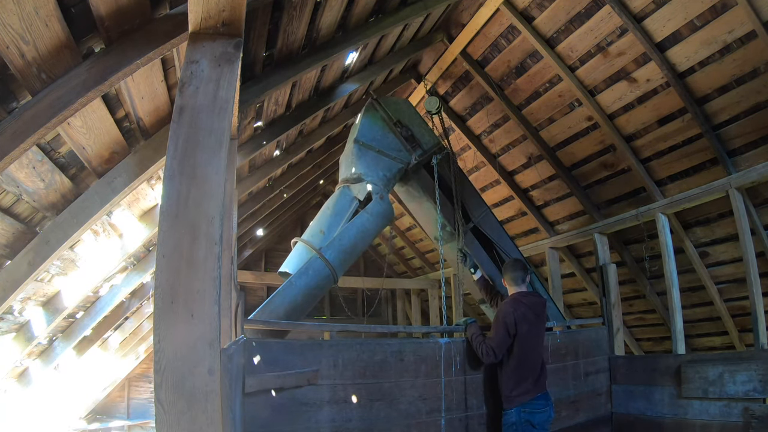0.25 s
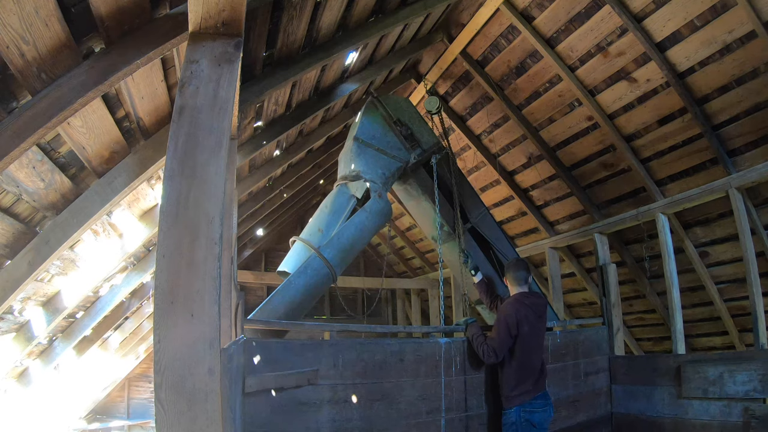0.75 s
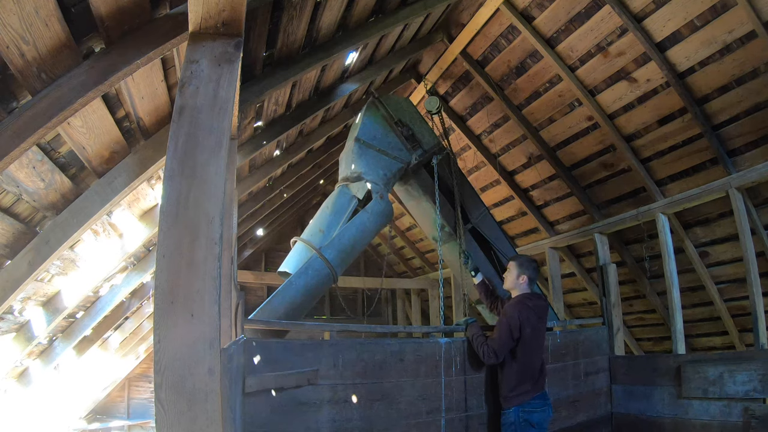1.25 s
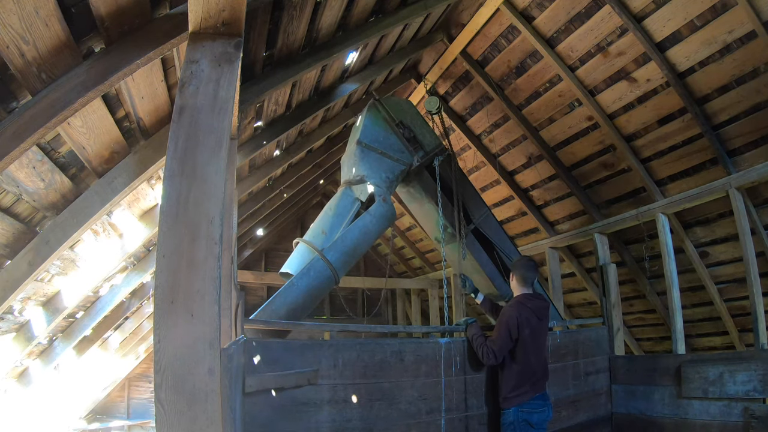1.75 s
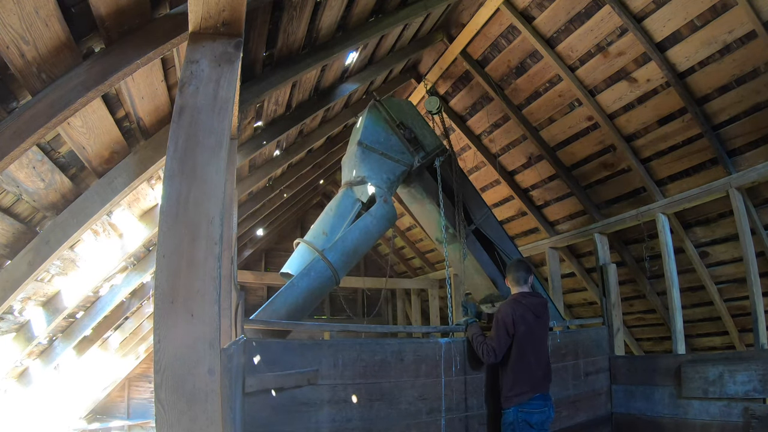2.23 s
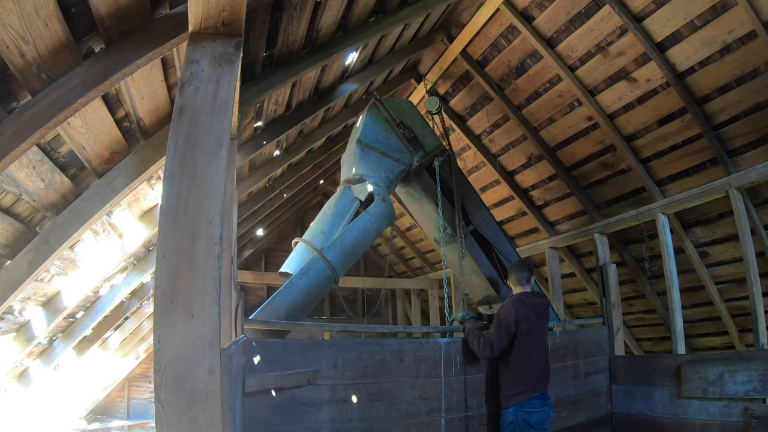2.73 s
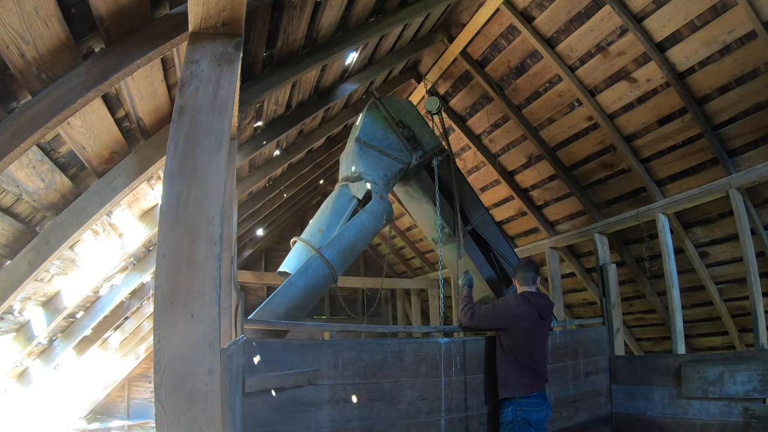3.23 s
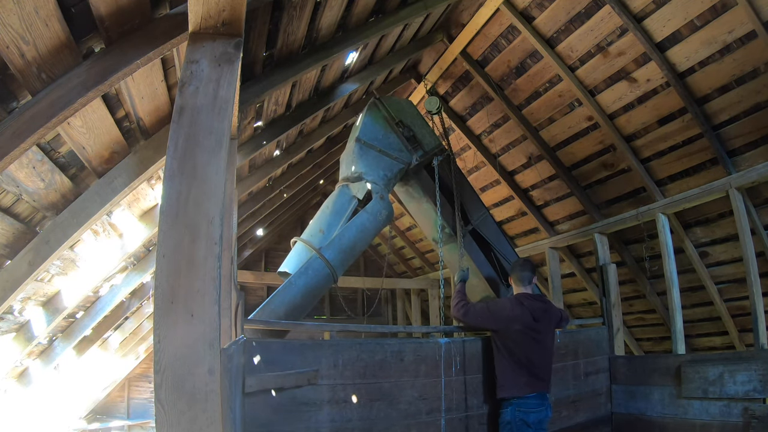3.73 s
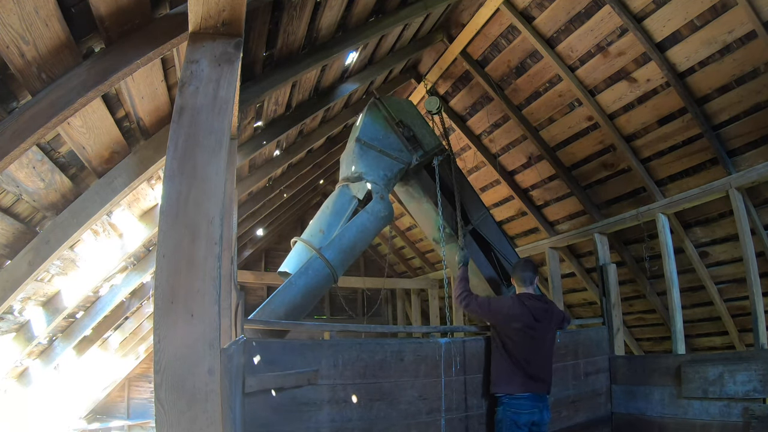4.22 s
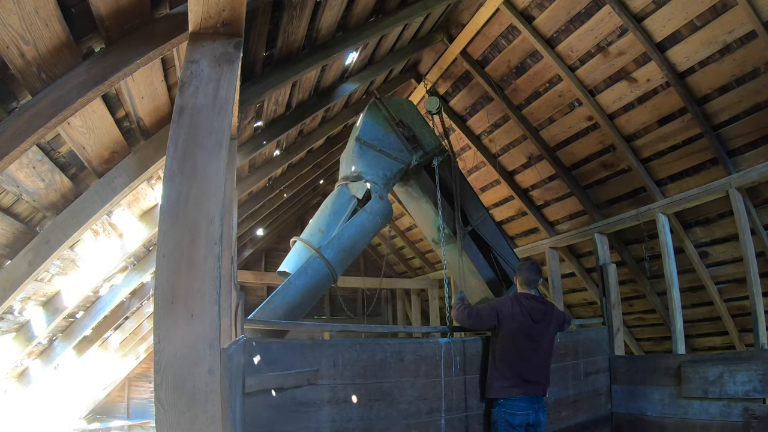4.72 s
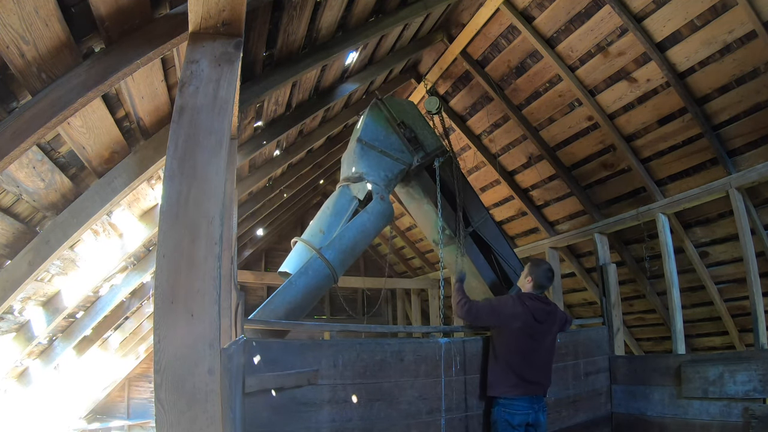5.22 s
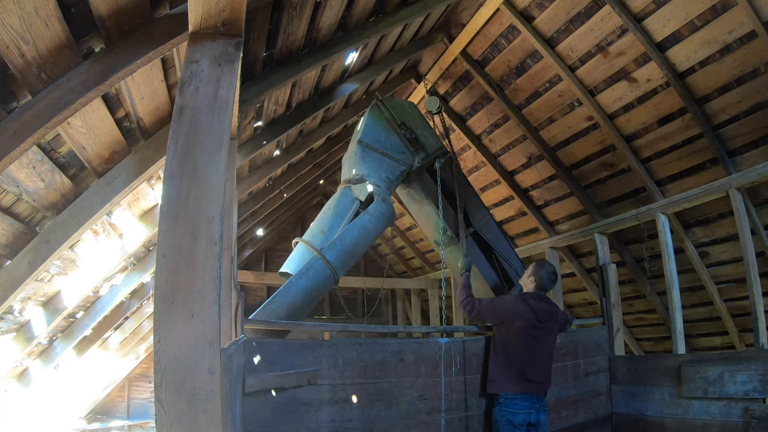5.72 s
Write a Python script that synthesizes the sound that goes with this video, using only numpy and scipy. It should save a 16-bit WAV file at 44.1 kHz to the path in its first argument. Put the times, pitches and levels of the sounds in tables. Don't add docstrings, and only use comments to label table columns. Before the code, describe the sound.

Metal chain links clatter and snap over a hoist wheel in repeated pulls, separated by quiet clinks and dull timber knocks.

```python
import sys
import numpy as np
from scipy import signal
from scipy.fft import rfft, irfft, next_fast_len
from scipy.io import wavfile
from scipy.ndimage import uniform_filter1d

SR = 44100
rng = np.random.default_rng(int(sys.argv[2]) if len(sys.argv) > 2 else 0)


def volts_from_db(level):
    exponent = np.asarray(level, float) / 20
    return 10 ** exponent


def dump(signal):
    limited = np.clip(np.atleast_2d(signal).T, -1, 1)
    pcm = np.round(limited * 32767).astype(np.int16)
    wavfile.write(sys.argv[1], SR, pcm)


N = 262836
PLACES = 6
SIZE = next_fast_len(N + 3 * SR // 4)
HZ = np.maximum(np.arange(SIZE // 2 + 1) * SR / SIZE, 1)

# (frequency [Hz], side over mid [dB])
STEREO_WIDTH = [(60, -19), (110, -10.5), (200, -22), (380, -13), (700, -6), (1290, -3), (2380, -7.5),
                (4400, -8), (8120, 1), (15000, 0.5)]


def in_time(rows):
    s, *columns = np.transpose(rows)
    return [np.interp(np.arange(N) / SR, s, c) for c in columns]


def at_hz(points, hz):
    point_hz, point_db = np.array(points)[:, :2].T
    return np.interp(np.log(hz), np.log(point_hz), point_db)


def causal(db):
    cepstrum = irfft(db * np.log(10) / 20, SIZE)
    cepstrum[1:SIZE // 2] *= 2
    cepstrum[SIZE // 2 + 1:] = 0
    return np.exp(rfft(cepstrum))


def share_db(low_hz, high_hz):
    steep = 12 if high_hz < 300 else 7
    return -10 * np.log10((1 + (low_hz / HZ) ** steep) * (1 + (HZ / high_hz) ** steep))


def uneven_sizes(spread_db):
    return volts_from_db(spread_db * np.minimum(rng.exponential(1, N), 3.0)) * rng.choice([-1, 1], N)


def knocks(per_s, spread_db):
    hits = uneven_sizes(spread_db) * (rng.random(N) < per_s / SR)
    here = rng.integers(0, PLACES, N) == np.arange(PLACES)[:, None]
    return hits * here / np.sqrt(np.mean(hits ** 2))


def dying_away(events, swell_s):
    power = np.zeros(N)
    for s, db, dying in events:
        at = round(s * SR)
        t = np.arange(min(N - at, SR // 2, int(dying * SR))) / SR
        power[at:at + len(t)] += volts_from_db(2 * (db - 60 * t / dying)) * (1 - np.exp(-t / swell_s))
    return power


def pulled(part):
    # (full speed at [s], length [s], links on wheel [dB], sag [dB/s], run-out [dB/s])
    hauls = [
        (1.675, 0.85, -30, 11, 500),
        (2.789, 0.16, -47, 55, 113),
        (4.532, 0.18, -25.5, 6.5, 200),
        (4.813, 0.19, -24.5, 10, 119.5),
        (5.727, 0.2, -26, -4, 100),
    ]
    # (level at a firm pull [dB], gain per pull [dB/dB], run-up [dB/s])
    responses = dict(chute=(-42, 0.52, 89), sheet=(-32.5, 0.65, 74), link=(-29.5, 0.83, 101),
                 tinkle=(-35, 1.1, 220), floor=(-44, 0.54, 200), beam=(-37.5, 0.5, 49),
                 boards=(-38, 0.51, 52))
    firm_db, follows, run_up = responses[part]
    t = np.arange(0, N, 32) / SR
    power = 0
    for s, length, db, sag, run_out in hauls:
        pull_db = db - sag * np.clip(t - s, 0, length)
        held_db = firm_db + follows * (pull_db + 30.5)
        held_db = held_db - 901 * np.maximum(s - 0.14 - t, 0)
        held_db = held_db - run_up * np.maximum(s - t, 0)
        held_db = held_db - run_out * np.maximum(t - s - length, 0)
        power = power + volts_from_db(2 * held_db)
    return np.interp(np.arange(N) / SR, t, power)


def still_air():
    # (frequency [Hz], level [dB])
    air_colour = [(15, -63), (25, -25), (91, -28), (178, 9), (488, -37), (700, -14.5), (5250, -27.5),
                  (9270, -37), (12000, -47), (15600, -94), (22000, -120)]
    hum_hz, hum_width_hz, hum_db = 181, 16, 2.5
    hum = hum_db / (1 + (2 * (HZ - hum_hz) / hum_width_hz) ** 2)
    mid, side = rfft(rng.standard_normal((2, SIZE))) * volts_from_db(at_hz(air_colour, HZ) + hum)
    side = side * volts_from_db(at_hz(STEREO_WIDTH, HZ))
    air = irfft(np.array([mid + side, mid - side]), SIZE)[:, :N]
    return volts_from_db(-60) * air / np.std(air)


def draught():
    # (time [s], level [dB], fading on both sides [dB/s])
    puffs = [(.2, -40, 55), (.7, -70, 150), (1.1, -70, 120), (1.9, -49, 60), (2.34, -44, 88),
             (2.75, -56, 37), (3.4, -61, 99), (4.08, -67, 150), (4.32, -50, 118), (4.9, -48, 24),
             (5.86, -55, 118)]
    rumble = rfft(rng.standard_normal((3, SIZE))) * volts_from_db(share_db(22, 46))
    shared, left, right = irfft(rumble, SIZE)[:, :N]
    wobble = np.array([shared + 0.93 * left, shared + 1.6 * right])
    wobble = wobble / np.std(wobble, axis=1, keepdims=True) * volts_from_db([[-2.8], [2.8]])
    t = np.arange(N) / SR
    puff_db = np.max([db - fading * np.abs(t - s) for s, db, fading in puffs], axis=0)
    return wobble * volts_from_db(puff_db)


def frame():
    # (time [s], beam level [dB])
    strain = [(0, -45.5), (.36, -51.5), (.58, -50.5), (.85, -75), (1.04, -55), (1.16, -59.5), (1.44, -45.5),
              (1.6, -45), (2.66, -51), (3.0, -48), (3.12, -78), (3.39, -39), (3.55, -79), (3.72, -63.5),
              (3.96, -49.5), (4.1, -54), (4.4, -55), (5.5, -48)]
    # (time [s], boards level [dB], floor over boards [dB], dying time [s])
    jolts = [(0, -28.5, 3, 0.053), (.09, -52.5, 2.5, 4.9), (.39, -31, -13.5, 0.15),
             (0.552, -29.5, -13, 0.15), (.76, -53, -30, .5), (0.877, -36, -37, 0.1), (1.14, -44, -37, 0.26),
             (1.56, -39.5, 2, 0.21), (1.7, -31, -8, .2), (2.15, -39, 0.5, 0.79), (2.45, -40, 0, 0.86),
             (2.69, -34.5, -20, 0.25), (2.78, -52.5, 4, .2), (2.87, -32.5, -22, 0.16),
             (3.031, -29.5, -29, 0.085), (3.24, -61, 8.5, 0.15), (3.349, -32.5, -7.5, 0.24),
             (4.2, -49.5, -1, .6), (4.57, -31, -1, 0.89), (4.93, -39, -17, .15), (5.01, -42, 8, 0.73),
             (5.17, -27.5, -6, 0.18), (5.35, -47, -7, .3), (5.52, -39.5, -1, 0.44), (5.72, -26, -35.5, 8.2),
             (5.9, -41, -8, 1.0)]
    strain_db, = in_time(strain)
    times, jolt_db, deep_db, dying = np.transpose(jolts)
    # (part, strain over beam [dB], jolt [dB], knocks [1/s], spread [dB])
    parts = [("floor", -32, jolt_db + deep_db, 130, 4.6),
             ("beam", 0, jolt_db - 9, 400, 1.9),
             ("boards", -5, jolt_db, 500, 4.2)]
    out = []
    for part, rest_db, hit_db, per_s, spread_db in parts:
        power = pulled(part) + volts_from_db(2 * (strain_db + rest_db))
        power = power + dying_away(zip(times, hit_db, dying), swell_s=0.018)
        out.append(knocks(per_s, spread_db) * np.sqrt(power))
    return out


def clatter_rows():
    # (time [s], peak [dB], brightness [dB], dying time [s])
    running = [(1.5005, -37, -2, 0.222), (1.5415, -30, -4.5, 0.46), (1.5588, -19, 3, 0.23),
               (1.6203, -29, 2.5, 0.49), (1.6678, -17.5, 9.5, 0.055), (1.763, -17.5, 4, 0.071),
               (1.875, -32, 8.5, .12), (1.9108, -23, -3.5, 0.14), (2.029, -25, 7.5, 0.16),
               (2.184, -32.5, 15.5, 0.077), (2.2856, -20, 1, 0.073), (2.318, -19.5, 2.5, 0.082),
               (2.409, -28.5, 4, 0.046), (2.4646, -19, -1, 0.057), (2.827, -32.5, 1, 0.2),
               (2.8598, -30.5, -0.5, 0.13), (4.3956, -28.5, 0, 0.5), (4.4209, -23.5, -1, 0.19),
               (4.462, -20.5, 5.5, 0.23), (4.7594, -19.5, 5, 0.17), (4.88, -26, -8.5, 0.053),
               (5.0688, -25.5, -0.5, 0.23), (5.1784, -20.5, -1, 0.032), (5.6474, -17, 2.5, 0.098),
               (5.7227, -17, -1.5, 0.062), (5.9269, -25.5, -4.5, 0.069), (4.4941, -22, -7, 0.05),
               (4.549, -25.5, 11, 0.13), (4.9032, -28, -3, .1), (5.7889, -28, 6, 0.087),
               (4.617, -28.5, 2, .07), (2.897, -33, 6, 0.06)]
    place_hz = [2440, 3200, 2760, 3550, 2790, 3020]
    # (time [s], peak [dB], brightness [dB], dying time [s],
    # clink [Hz])
    slack_clinks = [(0.0627, -47, -1, 0.038, 2760), (.1414, -53.5, -9, 0.27, 2570),
                    (0.177, -41.5, -4, 0.12, 2870), (0.3496, -39, 6.5, 0.2, 1800),
                    (0.451, -39, 1, 0.11, 3970), (0.487, -43.5, 0, 0.15, 3970), (.632, -56.5, 0, 0.2, 2900),
                    (.7724, -56, 22.5, 0.03, 2900), (.8495, -50.5, 13.5, 0.26, 2360),
                    (0.8593, -48, -12.5, 0.12, 1750), (1.005, -57, -7, 0.16, 3170),
                    (1.104, -58.5, -4, 0.32, 3400), (1.1668, -51, 1, .14, 3830),
                    (1.216, -55, -14.5, 0.054, 2780), (1.3436, -51.5, 0.5, 0.66, 2600),
                    (2.6767, -37, 2, 0.14, 4200), (2.7045, -38.5, 3, 0.08, 2900),
                     (3.014, -40.5, 7, 0.16, 2160), (3.2201, -56.5, 7, 0.11, 3140),
                     (3.2874, -44, 8, 0.11, 5400), (3.425, -59, 21, 0.2, 2230),
                     (3.449, -54.5, 17.5, 0.13, 3000), (3.692, -61, 5.5, 0.099, 3070),
                     (3.826, -63.5, 19, 0.2, 3450), (3.889, -57.5, 8.5, 0.39, 3180),
                     (4.0573, -47, 5.5, 0.31, 2600), (4.0992, -48.5, -3, 0.31, 3550),
                     (4.2334, -63, 14, 0.34, 3580), (4.3212, -35, 1, 0.036, 2130),
                     (5.342, -38, -1, 0.18, 2400), (5.446, -40, -1, 0.066, 2800),
                     (5.5058, -30, -1.5, 0.083, 1900), (5.5742, -33.5, 1.5, 0.22, 2950),
                     (4.006, -54.5, -5, 0.2, 2100), (4.254, -53, 12, 0.18, 3400),
                     (3.359, -48, -6, .12, 2400), (5.553, -43, 4, .1, 2900), (4.332, -46, 0, 0.073, 2300),
                     (3.304, -52, 3, .1, 3200), (2.548, -42, 7, .2, 3000), (5.6, -34, 0, .2, 2800),
                     (5.384, -48, 0, .1, 3000)]
    # (time [s], peak [dB], sheet over body [dB], dying time [s])
    thuds = [
        (0.18, -32.5, -9, 0.12),
        (.36, -45.5, 6, 0.22),
        (0.451, -45.5, 5, 0.11),
        (0.5442, -30, -8, 0.17),
        (1.3, -54, -25, 0.65),
        (3.3592, -30, -2.5, 0.17),
        (3.875, -50.5, -25, 0.79),
    ]
    # (time [s], links, tinkles, chute body, sheet over body [dB], dying time [s], clink [Hz], extra clink [dB])
    rows = []
    for k, (s, db, bright, dying) in enumerate(running):
        rows.append((s, db, db - 7.5 + bright, db - 3.5 - bright, 0, dying, place_hz[k % PLACES], 0))
    for s, db, bright, dying, hz in slack_clinks:
        rows.append((s, db, db - 15 + bright, db - 4 - bright, -2.5, dying, hz, 10))
    for s, db, sheet, dying in thuds:
        rows.append((s, db + sheet - 28, db + sheet - 36, db, sheet, dying, 1520, 5))
    return np.transpose(rows)


def clatters(times, level_db, dying, pitches, rattle_db, clink_db, clink_t60):
    link_modes = np.array([[.74], [.94], [1], [1.08], [1.42]])
    mode_gain = volts_from_db(-11 * (link_modes != 1))
    blows = np.zeros((PLACES, N))
    for k, (s, db, hz, ring_db) in enumerate(zip(times, level_db, pitches, clink_db)):
        at, place = round(s * SR), k % PLACES
        t = np.arange(min(N - at, SR // 8)) / SR
        clink = (mode_gain * np.sin(2 * np.pi * hz * link_modes * t)).sum(0)
        blows[place, at:at + len(t)] += volts_from_db(db + ring_db - 60 * t / clink_t60) * clink
        blows[place, at] = volts_from_db(db)
    return dying_away(zip(times, level_db + rattle_db, dying), swell_s=0.0031), blows


def ringing(drive, low_hz, high_hz, ring_db, cycles):
    out, piece = drive.copy(), rng.integers(0, 5, N)
    pitches = rng.permutation(np.geomspace(low_hz, high_hz, PLACES * 5)).reshape(PLACES, 5)
    for (place, k), hz in np.ndenumerate(pitches):
        r, w = volts_from_db(-60 * hz / cycles / SR), 2 * np.pi * hz / SR
        struck = drive[place] * (piece == k) + 1e-18
        rung = signal.lfilter([0, np.sin(w)], [1, -2 * r * np.cos(w), r * r], struck)
        out[place] += volts_from_db(ring_db) * rung
    return out / np.sqrt(np.mean(out ** 2) / np.mean(drive ** 2))


def chain():
    # (time [s], links level [dB], weight against the chute [dB])
    sway = [(0, -56.5, 1), (.35, -64.5, -4), (.53, -71, 23), (.66, -67.5, 12.5), (.93, -70, -5),
            (1.24, -71, -8), (1.43, -55, 11), (1.58, -41.5, -5), (2.56, -51.5, 2), (3.07, -70, -26),
            (3.29, -64.5, 13), (3.4, -58.5, 11), (3.55, -79, -10), (3.82, -75.5, 11.5), (4.02, -66.5, -0.5),
            (4.37, -56, -6), (5.35, -62.5, 9), (5.56, -54.5, -4)]
    sway_db, weight_db = in_time(sway)
    times, link_db, tinkle_db, chute_db, sheet_db, dying, pitches, loose_db = clatter_rows()
    parts = [
        ("chute", sway_db + weight_db - 5.5, chute_db - 11.5, 700, 2.8, 7, (490.0, 909.0, -24, 47.0)),
        ("sheet", sway_db + 0.41 * weight_db + 2.5, chute_db + sheet_db - 0.5, 1000, 2.7, 7,
         (900.5, 2114.0, -25.5, 72.0)),
        ("link", sway_db, link_db, 1500, 3.6, 10, (2111.0, 5698.0, -23.0, 102.5)),
        ("tinkle", sway_db - 11.5, tinkle_db, 1900, 4.0, 11, (5699.5, 10393, -24.0, 151.0))]
    out = []
    for part, slack_db, hit_db, per_s, spread_db, blow_db, rings in parts:
        flurry, blows = clatters(times, hit_db, dying, pitches, rattle_db=-0.5,
                                 clink_db=loose_db - 23.0, clink_t60=0.042)
        power = pulled(part) + volts_from_db(2 * slack_db) + flurry
        drive = ringing(knocks(per_s, spread_db), *rings) * np.sqrt(power)
        out.append(drive + blows * volts_from_db(blow_db))
    return out


def ticks():
    # (time [s], peak [dB],
    # left over right [dB])
    link_snaps = [(0.1789, -32, -3), (0.1923, -35, -2), (0.3361, -44, -2), (0.454, -31, -1),
                  (0.852, -38.5, -10), (1.1062, -48, 0), (1.765, -7, 5), (1.819, -21, -3),
                  (1.8509, -22, -2), (2.1853, -13, 1), (2.3643, -17, -4), (2.5501, -20, -3),
                  (2.5856, -26, -7), (2.6464, -34, -2), (2.8668, -17, 0), (3.0175, -26, -7),
                  (3.1672, -50, -6), (3.3603, -37, -3), (3.6933, -50, -15), (3.8366, -48, 2),
                  (4.0591, -41, -2), (4.3215, -36, 0), (4.408, -20, 0), (4.562, -9, -2), (4.6, -10, -3),
                  (5.5106, -35, 0), (5.5546, -29, -3), (5.5766, -29, 0),
                  (1.598, -18, -0.5), (1.62, -18, 0), (1.682, -16, 0), (1.782, -15.5, -1),
                  (1.941, -15.5, -1), (2.038, -5, -2.5), (2.062, -18, -2), (4.585, -8, -2),
                  (4.771, -10.5, 0), (4.881, -7.5, -1.5), (5.742, -6.5, -0.5), (5.794, -11, 0),
                  (5.844, -4, 0), (5.93, -11.5, -1.5), (5.945, -10.5, -1),
                  (3.2915, -31, -1), (4.2873, -39, -2), (4.427, -10, 1), (4.4692, -5, -1.5),
                    (4.5004, -7, -4), (4.5143, -10, -6), (4.6655, -11, -3), (4.8498, -9, -1),
                    (5.0164, -11, -2.5), (5.07, -13, -3), (5.5314, -29, -3), (5.9355, -10, -3),
                    (1.2197, -44, -1), (2.6784, -32, -1), (3.3815, -34, -1), (3.389, -35, -1),
                    (.8605, -36, -1), (2.4665, -16, -1)]
    click_hz = [1500, 3300, 6200]
    click_t60_s, patter_per_s, patter_pan_db = .0025, 260, 2.5
    t = np.arange(SR // 50) / SR
    click = sum(np.sin(2 * np.pi * hz * t) for hz in click_hz) / len(click_hz)
    click = click * volts_from_db(-1 - 60 * t / click_t60_s)
    out = np.zeros((2, N))
    for s, db, left_db in link_snaps:
        out[:, round(s * SR) - 3] += volts_from_db(db + np.array([left_db / 2, -left_db / 2]))
    sizes = volts_from_db(10) * uneven_sizes(spread_db=2)
    patter = sizes * (rng.random(N) < patter_per_s / SR) * np.sqrt(pulled("link"))
    out += patter * volts_from_db(patter_pan_db * rng.standard_normal(N) * [[.5], [-.5]])
    return signal.fftconvolve(out, click[None], axes=1)[:, :N]


def sheet_rings():
    # (time [s], peak [dB], frequency [Hz], t60 [s])
    after_rings = [(.357, -40.5, 1840, 0.21), (.453, -42, 1880, .25), (.452, -43.5, 3973, 0.2),
                   (.547, -38, 900, .1), (.547, -41, 690, .15), (0.33, -46, 1150, .12),
                   (.549, -43, 1750, .08), (.56, -43, 470, .25), (0.5, -46, 2700, .15),
                   (.487, -50, 3700, 0.18), (.49, -47, 2500, .2), (.548, -49, 1900, .2),
                   (3.42, -42, 1540, 0.14), (.354, -49.5, 3973, .25), (.356, -47, 3000, .15),
                   (.206, -50, 2300, 0.33), (.452, -44, 3060, .12), (3.362, -40, 1620, .25),
                   (3.36, -36.5, 1500, 0.24), (3.235, -55, 760, 0.27), (3.362, -42, 1900, .1),
                   (5.182, -34, 3300, 0.11), (5.349, -37, 3200, .07), (5.509, -37, 3600, .08),
                   (5.515, -38, 1800, .1), (5.577, -35, 2700, 0.11), (4.322, -46, 1900, .1),
                   (1.6, -54, 610, 1.2), (3.9, -56, 700, 1.22), (3.97, -60, 640, 0.72),
                   (.575, -45, 700, 0.24), (3.375, -38, 900, .15), (3.39, -42, 1450, .1)]
    detune_share = .018
    out = np.zeros((2, N))
    draws = rng.uniform(-0.96, 1, (len(after_rings), 3, 4, 1))
    for (s, db, hz, t60), (detune, phase, pan) in zip(after_rings, draws):
        at = round(s * SR)
        t = np.arange(min(N - at, SR // 2)) / SR
        modes = np.sin(2 * np.pi * hz * (1 + detune_share * detune) * t + np.pi * phase)
        sides = np.array([(modes * (1 + .5 * pan)).sum(0), (modes * (1 - .5 * pan)).sum(0)])
        envelope = volts_from_db(db - 2.5 - 60 * t / t60) * (1 - np.exp(-t / 0.0025))
        out[:, at:at + len(t)] += envelope * sides
    return out


def thumps():
    # (time [s], peak [dB], frequency [Hz], t60 [s])
    timber_thumps = [(0.565, -31, 99, 0.11), (.635, -41, 197, 0.38), (1.031, -45, 168.5, 0.22),
                     (1.41, -39, 195.6, 1), (1.569, -41, 78.1, 0.17), (1.679, -29.5, 66.3, 0.15),
                     (2.128, -28, 76, 0.17), (2.783, -40.5, 79, 0.39), (3.375, -42.5, 103, 0.16),
                     (4.209, -52, 94.2, 0.13), (4.49, -25, 186.4, 0.41), (4.593, -46, 83, 0.13),
                     (5.21, -42, 84, 0.19), (5.349, -40.5, 85, 0.33), (5.449, -42, 91, 0.39),
                     (5.723, -35, 366, 0.52), (5.744, -22, 411.4, 0.29), (5.844, -27.5, 407, 0.22),
                     (5.86, -28, 364.4, 0.75), (5.92, -26.5, 392, 0.61), (3.379, -35, 164, .15),
                     (3.394, -31, 620, 0.11), (3.41, -34.5, 175, 0.24), (0.419, -48, 200, 0.18),
                     (1.04, -61, 78, .4), (1.24, -64, 66, .3), (3.23, -58, 80, .3), (3.88, -62, 80, .3),
                     (4.13, -56, 90, .2)]
    out = np.zeros(N)
    for s, db, hz, t60 in timber_thumps:
        at = round(s * SR)
        t = np.arange(min(N - at, SR // 2)) / SR
        envelope = volts_from_db(db + 2.0 - 60 * t / t60) * (1 - np.exp(-t / 0.0088))
        out[at:at + len(t)] += envelope * np.sin(2 * np.pi * hz * t)
    return out


def wheel():
    t = np.arange(N) / SR
    loaded = (t > 4.39) & (t < 5.3)
    return knocks(900, 4.0) * np.sqrt(pulled("link")) * volts_from_db(-2.5) * loaded


def barn(wet_db, build_s):
    # (frequency [Hz], t60 [s])
    reverb_t60 = [(60, 0.061), (250, 0.48), (1000, 0.39), (3000, 0.25), (10000, 0.18)]
    # (frequency [Hz], left over right [dB])
    left_over_right = [(60, -2), (180, 0.4), (600, -1.5), (1400, -2.6), (5000, -0.7), (9000, -1.5),
                       (14000, 0)]
    t = np.arange(3 * SR // 4) / SR
    edges = 25 * 2. ** np.arange(0, 9.7, .8)
    white, tails = rng.standard_normal((PLACES, 2, len(t))), 0
    for low, high in zip(edges, edges[1:]):
        t60 = at_hz(reverb_t60, np.sqrt(low * high))
        band = signal.sosfilt(signal.butter(2, [low, high], "band", fs=SR, output="sos"), white)
        tails = tails + band * volts_from_db(-60 * t / t60) / np.sqrt(t60 * SR / 14)
    tails = tails * volts_from_db(wet_db) * (1 - np.exp(-t / build_s))
    tails[:, 0, 0] = 1
    tails[:, 1, 0] = (-1) ** np.arange(PLACES)
    paths = rfft(tails, SIZE)
    mid, side = paths[:, 0], paths[:, 1] * volts_from_db(at_hz(STEREO_WIDTH, HZ))
    left_db = at_hz(left_over_right, HZ)
    return np.stack([(mid + side) * volts_from_db(left_db / 2), (mid - side) * volts_from_db(-left_db / 2)], axis=1)


def scene():
    # (frequency [Hz], level per Hz [dB])
    colour = [(30, -34.5), (75, -19), (119, -20), (183, -3), (253, -10.5), (410, -7.5), (495, -15),
              (684, -3), (900, -2), (1380, 3), (2150, 3.5), (3530, 6.5), (4610, 2.5), (7600, 2)]
    # (frequency [Hz], level [dB])
    mic = [(7600, -1.5), (8300, -8), (9300, -4.5), (10200, -10), (11300, -25.5), (14800, -27),
           (15700, -42.5)]
    # (frequency [Hz], width [Hz], level over the colour [dB])
    timber_modes = [(78.6, 8.8, 10), (181.4, 13, 2), (380, 35, -1.5), (431, 7.7, -4)]
    # (frequency [Hz], width [Hz], level over the colour [dB])
    steel_modes = [(539.6, 20, 7), (650, 15, 4.5), (701, 18, 4), (1240, 13, 1), (1392, 12, 3),
                   (1654, 71, 3.5), (1976, 65, 3), (2504, 49, 5.5), (2813, 131, 4.5), (3110, 49, 3.5),
                   (3480, 21, 7), (3840, 36, 3), (4284, 50, 4), (7630, 300, 0.5)]
    split_hz = [50, 118, 245, 470, 900, 1980, 5700, SR]
    paths = barn(wet_db=9.5, build_s=0.00079)
    power = np.mean(np.abs(paths.mean(axis=1)) ** 2, axis=0)
    body_db = at_hz(colour, HZ) + at_hz(mic, HZ)
    for hz, width_hz, db in timber_modes + steel_modes:
        body_db = body_db + db / (1 + (2 * (HZ - hz) / max(width_hz, 22)) ** 2)
    body_db = body_db - 10 * np.log10(uniform_filter1d(power, size=150))
    objects = [*zip(frame() + chain(), split_hz, split_hz[1:]), (wheel(), 2950, 3950)]
    out = 0
    for drive, low_hz, high_hz in objects:
        voice = causal(body_db + share_db(low_hz, high_hz))
        out = out + rfft(drive, SIZE) * voice / np.sqrt(np.mean(power * np.abs(voice) ** 2))
    in_barn = irfft(np.sum(out[:, None] * paths, axis=0), SIZE)[:, :N]
    return in_barn + still_air() + draught() + ticks() + sheet_rings() + thumps()


def roll_off(x):
    return signal.sosfilt(signal.butter(12, 15630, fs=SR, output="sos"), x)


def record(dry):
    mix = 0.63 * np.tanh(dry / 0.74)
    return roll_off(mix)


dry = scene()
out = record(dry)
dump(out)
```